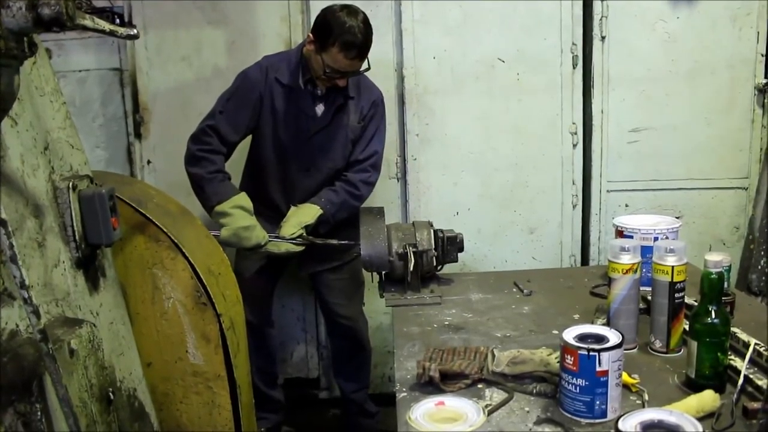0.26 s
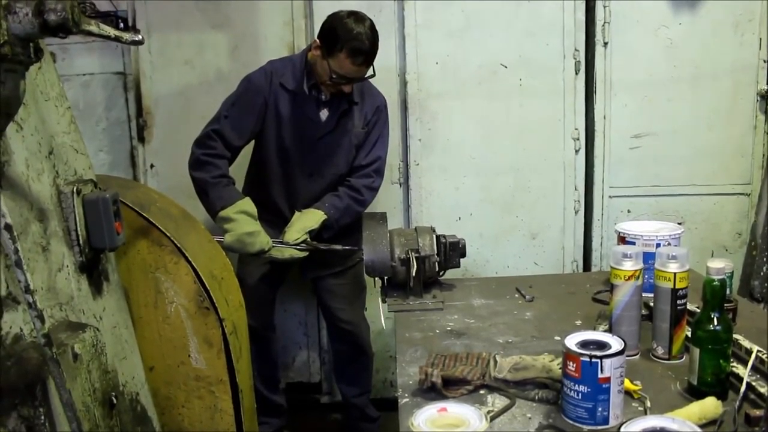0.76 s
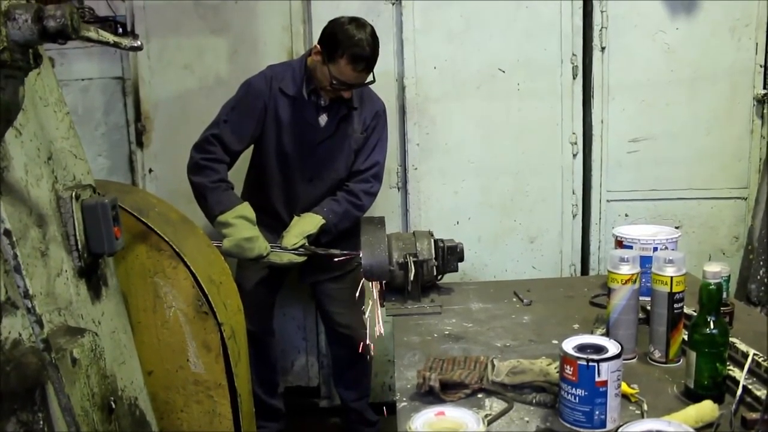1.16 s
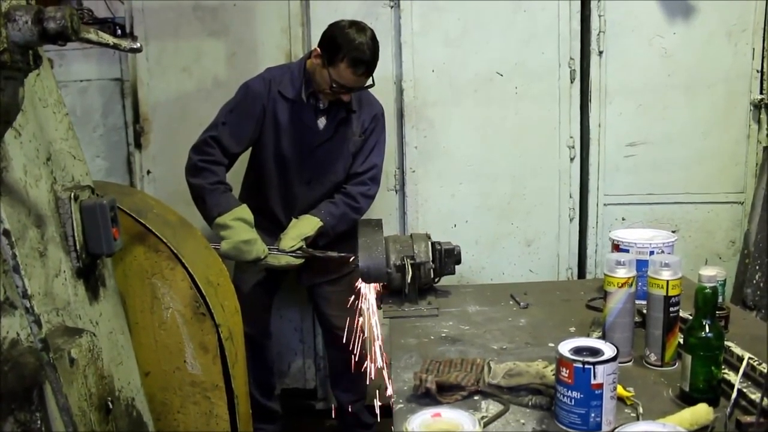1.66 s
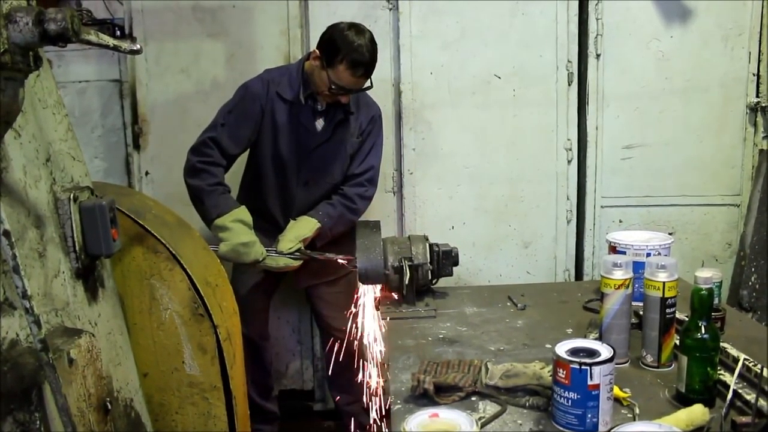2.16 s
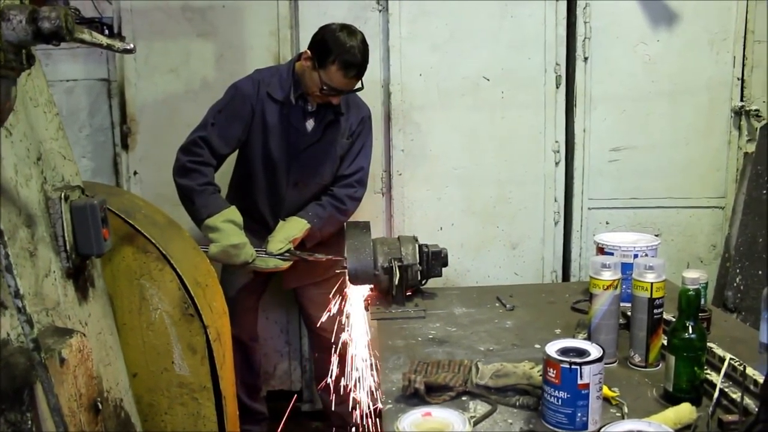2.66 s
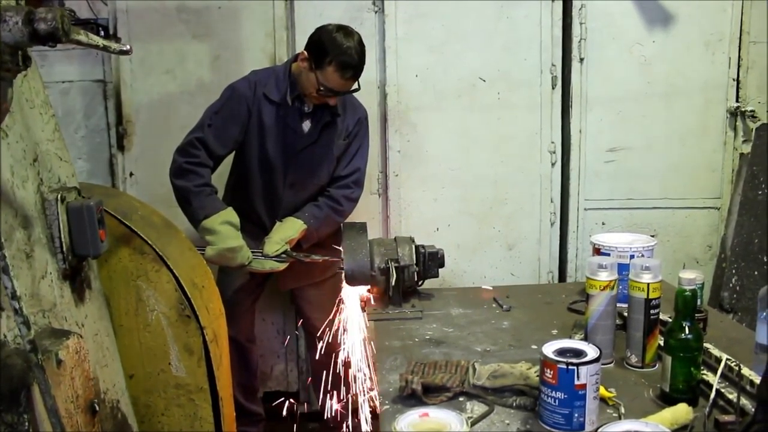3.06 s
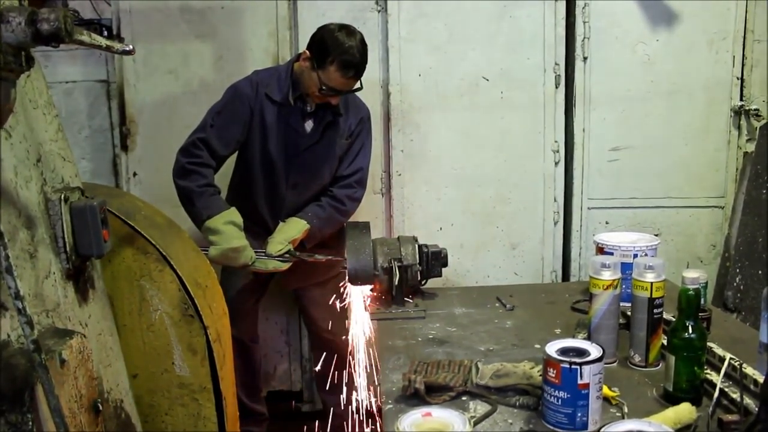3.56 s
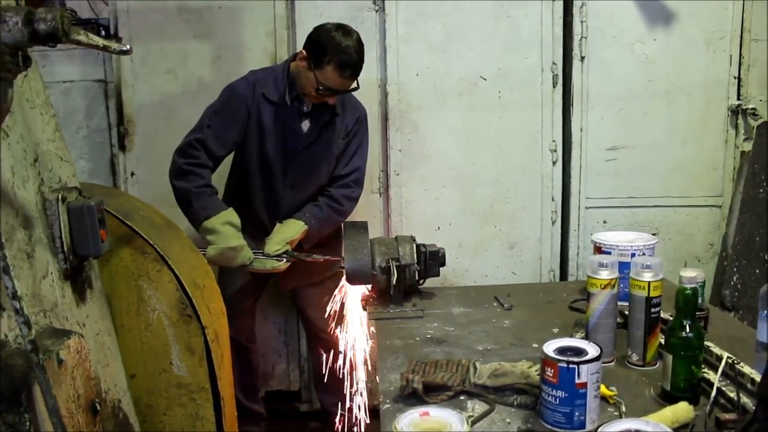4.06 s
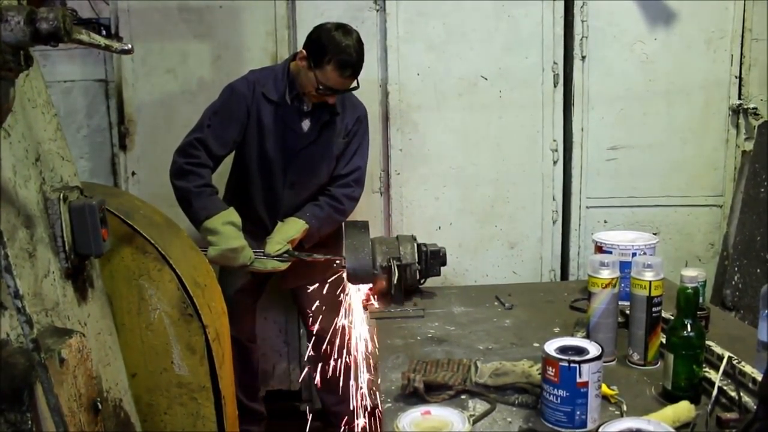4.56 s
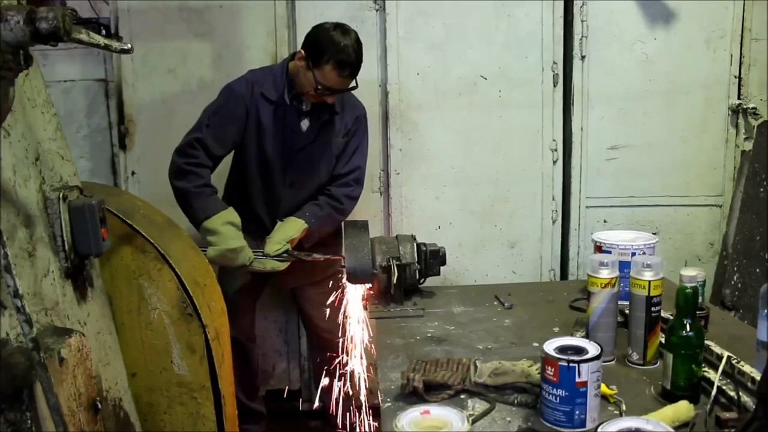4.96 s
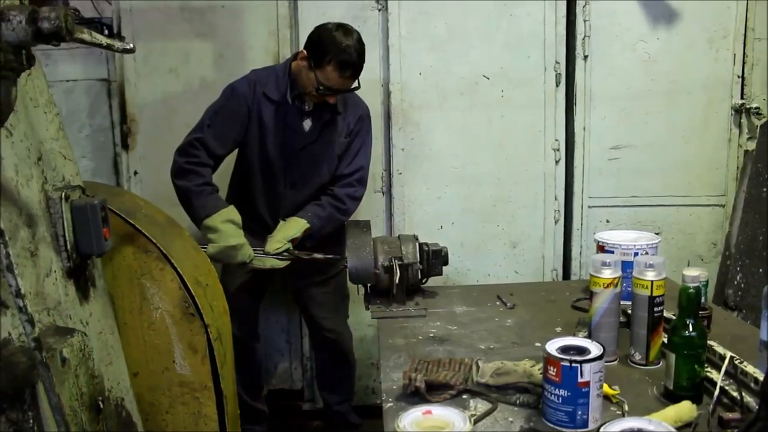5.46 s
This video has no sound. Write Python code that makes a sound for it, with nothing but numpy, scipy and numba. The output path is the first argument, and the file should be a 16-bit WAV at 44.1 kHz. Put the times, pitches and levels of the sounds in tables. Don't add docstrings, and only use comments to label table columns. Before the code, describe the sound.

A steel bar is ground on a spinning wheel in a hard-walled workshop. From 0 s a loud, gritty hiss and piercing metallic ring flutter roughly 25 times a second, with stronger knocking from 0.65 s. At about 1.4 s the contact lightens, then from 2.0 s the bar sweeps across with a smoother, less regular rasp, ringing as it lifts near 2.65 s. In the pause, a short stick-slip scrape sounds around 2.9-3.05 s and small bright scratches at 3.2-3.45 s, while low motor hum, rumble and airy whirr swell. Grinding bites again at 3.8 s and eases near 4.4 s. A faint rough squeal climbs around 4.5 s amid two hard dabs, at about 4.55 and 4.8 s. After 5.03 s only the running motor remains, growing louder to the end. Close-set stereo microphones, short reverberation, slightly saturated peaks and automatic gain.

```python
import sys
import numpy as np
from scipy import signal
from scipy.fft import rfft, irfft, next_fast_len
from scipy.io import wavfile
from scipy.ndimage import uniform_filter1d
from numba import njit

SR = 44100
rng = np.random.default_rng(int(sys.argv[2]) if len(sys.argv) > 2 else 0)


def bounce(signal):
    frames = np.transpose(np.atleast_2d(signal))
    limited = np.clip(frames, -1, 1)
    pcm = np.round(limited * 32767).astype(np.int16)
    wavfile.write(sys.argv[1], SR, pcm)


def volts(x):
    e = np.asarray(x, float) / 20
    return 10 ** e


N = 252252
SIZE = next_fast_len(N + SR)
HZ = np.arange(SIZE // 2 + 1) * SR / SIZE + 1e-3
T = np.arange(N) / SR


def unit(x):
    return x / np.sqrt(np.mean(abs(x) ** 2))


def columns(table):
    s, *values = np.transpose(table)
    return [np.interp(T, s, v) for v in values]


def stepped(table, slew_s):
    s, *values = np.transpose(table)
    row = np.maximum(np.searchsorted(s, T, side="right") - 1, 0)
    return [uniform_filter1d(v[row], int(slew_s * SR), mode="nearest") for v in values]


def colour(points):
    hz, db = np.transpose(points)
    return volts(np.interp(np.log(HZ), np.log(hz), db))


def ringing(modes):
    response = 0
    for k, (hz, width, db) in enumerate(modes):
        response = response + (-1) ** k * volts(db) / (1 + 2j * (HZ - hz) / width)
    return response


def through(x, response):
    return irfft(rfft(x, SIZE) * response, SIZE)[..., :N]


def walk(rate):
    k = int(SR / rate)
    held = np.repeat(rng.standard_normal(N // k + 1), k)
    return unit(uniform_filter1d(uniform_filter1d(held, k), k)[:N])


# (time [s], share of the rim's roughness returning next turn [0-1], knock [0-1])
HOLDS = [
    (0, .88, .25),
    (.65, .88, 1),
    (1.4, .8, .3),
    (2.02, .22, 0),
    (3.2, .35, 0),
    (3.87, .72, .2),
    (4.38, .3, 0),
]


def wheel():
    share, knock = stepped(HOLDS, slew_s=0.2)
    turns_hz = 24.85 - 0.23 * knock
    return turns_hz, share, knock


@njit
def turn_again(fresh, lag, share):
    y = fresh.copy()
    for i in range(2000, len(y)):
        back = i - lag[i]
        k = int(back)
        last = y[k] + (back - k) * (y[k + 1] - y[k])
        y[i] = share[i] * last + np.sqrt(1 - share[i] ** 2) * fresh[i]
    return y


def rim(fresh, keep=1.0):
    turns_hz, share, _ = wheel()
    return turn_again(fresh, SR / turns_hz, np.clip(keep * share, 0, 0.97))


def knocks():
    turns_hz, _, strength = wheel()
    turn = np.floor(np.cumsum(turns_hz) / SR + 0.88)
    return strength * np.diff(turn, prepend=0) * np.sqrt(SR / turns_hz)


def touching():
    first = T < SWEEP[-1][0]
    second = (T > RETURN[0][0]) & (T < DABS[-1][0])
    return 1.0 * (first | second)


# (frequency [Hz], width [Hz], level [dB])
BAR = [(916, 125, -6.5), (1062, 37, -12), (1089, 18, -4.5), (1190.4, 16.6, 7), (1263, 24.5, 2),
       (1312, 31, 1.5), (1420, 54, -2.5), (1802, 17, -14), (2176, 31, -11), (2926, 44, 4.5), (3713, 21, 3),
       (4074, 44, 4.5), (4173, 58, 1.5), (4370, 49, -3), (4600, 30, -7), (5000, 30, -23), (5660, 20, 3),
       (6500, 58, -27), (7060, 41, -27), (7430, 61, 7.5), (8400, 160, -4.5), (9260, 170, 6.5),
       (9450, 38, -22), (11300, 110, -10)]
# (frequency [Hz], density [dB per Hz])
GRIT = [(290, -100), (500, -9), (805, -30), (1220, -35), (1610, -7), (1880, -5), (2620, -8), (2860, 4.5),
        (3310, 0.5), (4100, 10.5), (6800, 1), (10600, 2.5), (15700, -12)]
# (time [s], pressure as heard [dB], how freely the bar rings [dB])
LONG_CUT = [
    (0.0, -22, -2),
    (0.022, -23, -6.5),
    (0.118, -23.5, -1.5),
    (0.95, -23, -10),
    (1.224, -23, -6.5),
    (1.246, -21.5, -9),
    (1.37, -26, -2.5),
]
LIGHT_CUT = [
    (1.39, -29.5, -7),
    (1.52, -27.5, -8),
    (1.956, -25, -10),
    (1.96, -25, -14),
]
SWEEP = [
    (1.99, -24.5, -4),
    (2.04, -24, -0.5),
    (2.27, -22.5, -2),
    (2.426, -27.5, 2.5),
    (2.54, -22, -4.5),
    (2.616, -29, 3),
    (2.63, -39, 6),
    (2.66, -33, 12),
]
RETURN = [
    (3.81, -33, -4),
    (3.816, -25, -4.5),
    (3.92, -23, -1),
    (4.266, -23, -6.5),
    (4.312, -24, -11),
    (4.38, -28.5, -7),
]
DABS = [
    (4.41, -26.5, -4),
    (4.436, -27, -2),
    (4.506, -29, -8),
    (4.548, -20.5, -10.5),
    (4.75, -28.5, -4.5),
    (4.796, -20.5, -9.5),
    (4.972, -30.5, -0.5),
    (5.028, -46, -6),
    (5.04, -49, -2),
]
# (time [s], low body of the bar [dB], its overtone [dB], bite of the grit [dB])
GRIPS = [
    (0, -10, -16, -0.5),
    (.65, -10.5, -12, -1.5),
    (1.15, -7.5, -10.5, -2.5),
    (1.4, -6.5, -15, 0.5),
    (1.99, -5.5, -12.5, -3.5),
    (2.45, -5.5, -12, -5.5),
    (3.81, -8.5, -14, -3),
    (4.2, -7.5, -11, -2),
    (4.53, -9.5, -12, -3.5),
    (4.77, -7.5, -10, -4),
]


def grinding():
    throb = volts(1.33 * rim(walk(300)) + 0.33 * rim(walk(50)))
    grains = volts(3.0 * np.minimum(rng.exponential(size=N), 5))
    scrape = rim(unit(grains * rng.standard_normal(N)), keep=0.93) * unit(throb)
    thumped = scrape * (1 - 0.35 * wheel()[2]) + 1.35 * knocks()

    body = colour(GRIT) * volts(-4) + ringing(BAR)
    low = 1 / (1 + (HZ / 2500) ** 8)
    high = 1 / (1 + (6500 / HZ) ** 8)
    ring = 1 / (1 + ((HZ - 1130) / 300) ** 4)
    overtone = 1 / (1 + ((HZ - 2930) / 170) ** 4)

    pressure_db, ring_db = columns(np.vstack([LONG_CUT, LIGHT_CUT, SWEEP, RETURN, DABS]))
    body_db, overtone_db, bite_db = stepped(GRIPS, slew_s=0.11)
    on_rim = touching() * volts(pressure_db + 0.55)
    parts = [(scrape, 1 - low - high - overtone, 0),
             (scrape, overtone, overtone_db),
             (scrape, low - ring, body_db + 1.5),
             (thumped, ring, ring_db + 0.18),
             (scrape, high, bite_db + 0.9)]
    out = 0
    for push, band, db in parts:
        out = out + rfft(push * on_rim * volts(db), SIZE) * unit(body * band)
    return irfft(out, SIZE)[:N]


# (frequency [Hz], level [dB rms])
HUM = [(50, -49), (75, -53), (99.8, -39.5), (125, -56), (150, -56), (175, -60), (199.8, -31.5),
       (224.6, -36.5), (249.8, -37.5), (300, -41.5), (500, -40.5), (525, -48)]
# (frequency [Hz], density [dB per Hz])
RUMBLE = [(15, -62), (25, -75), (69, -12), (91, -9.5), (167, -3), (201, -4.5), (324, -5), (507, -7),
          (734, -5), (1000, -10.5), (1300, -55), (2200, -120)]
# (frequency [Hz], density [dB per Hz])
WHIRR = [(410, -14), (700, -16.5), (1360, 3), (1470, -5), (1790, -27), (2090, -7.5), (2380, -5),
         (4330, -5.5), (5690, -10.5), (10900, -21), (15700, -32)]
# (frequency [Hz], width [Hz], level [dB])
CASING = [(1065, 83, -12.5), (1458, 75, 1), (1796, 100, 0.5), (2500, 21, -22), (2550, 260, -20.5),
          (3110, 41, -34), (3980, 35, -37), (4300, 44, -32)]
# (time [s], motor level [dB])
GAIN = [(0, -36), (.9, -40.5), (1.2, -36.5), (1.5, -37.5), (2.0, -32.5), (2.2, -37), (2.75, -37.5),
        (2.9, -37), (3.15, -34.5), (3.4, -30.5), (3.77, -26), (3.9, -34), (4.05, -39), (4.5, -35),
        (5.03, -37), (5.3, -32.5), (5.72, -28)]


def motor():
    gain_db = columns(GAIN)[0]
    load = uniform_filter1d(touching(), int(0.2 * SR), mode="nearest")
    idle_hum_db, loaded_hum_db = -0.6, -7
    hum_db = idle_hum_db + (loaded_hum_db - idle_hum_db) * load
    rumble_db = 0.13 + 1.5 * load * (1 - wheel()[1])

    lines = 0
    for hz, db in HUM:
        lines = lines + volts(db + 0.39 * walk(6.17)) * np.sin(2 * np.pi * (hz * T + rng.random()))
    rumble = through(rim(rng.standard_normal(N), keep=0.28), colour(RUMBLE))
    rattle = rng.standard_normal(N) * volts(1.0 * walk(200) + 0.78 * walk(6.7))
    whirr = through(rattle, colour(WHIRR) + volts(6.5) * ringing(CASING))
    mix = volts(hum_db) * unit(lines) + volts(rumble_db) * unit(rumble) + volts(4.5) * unit(whirr)
    return volts(gain_db) * mix


def drag_db():
    attack_s, hold_s, fade_db_s = 0.015, 0.083, 159
    age = T - 2.922
    rise = -22 * np.clip(1 - age / attack_s, 0, 1)
    fade = -fade_db_s * np.clip(age - attack_s - hold_s, 0, 0.08)
    return np.where((age > 0) & (T < 3.2), -24 + rise + fade, -120)


# (frequency [Hz], width [Hz], level [dB])
REST = [(1490, 26, 3), (1830, 74, -1.5), (2120, 64, -6), (2710, 100, -2.5), (3320, 21, -3), (3370, 55, -13),
        (3740, 26, -9), (4500, 73, -4), (5100, 44, -13), (6470, 27, -22), (6340, 33, -18),
        (8750, 43, -32.5), (9400, 49, -18), (10600, 140, -31)]


def drag():
    clicks = volts(2.5 * np.minimum(rng.exponential(size=N), 5)) * rng.standard_normal(N)
    slips = clicks * volts(2 * walk(80))
    scuff = volts(-14.0) / (1 + (HZ / 6000) ** 4) / (1 + (900 / HZ) ** 4)
    return through(unit(slips) * volts(drag_db()), unit(ringing(REST) + scuff))


# (time [s], peak level [dB])
TOUCHES = [(3.201, -34), (3.2754, -10), (3.2894, -16), (3.322, -12), (3.3944, -16), (3.404, -13),
           (3.4355, -15), (3.7558, -13.5), (3.8114, -7), (3.8168, -5.5), (3.8514, -4), (3.8894, -4),
           (4.438, -8.5), (4.4756, -10), (4.5295, -7), (4.544, -4), (4.5894, -8), (4.7705, -11),
           (4.7873, -4.5), (4.8298, -17), (4.9444, -15)]
# (frequency [Hz], density [dB per Hz])
TOUCH = [(1180, -42), (2000, -20), (2260, -27), (3880, 6), (5580, -1.5), (10300, 6.5), (13800, -4),
         (15700, -10)]


def touches():
    t60_s = 0.021
    push = np.zeros(N)
    for s, db in TOUCHES:
        near = slice(int(s * SR), int(s * SR) + SR // 10)
        age = np.maximum(T[near] - s, 0) * np.log(1000) / t60_s
        push[near] += volts(db - 10.5) * age * np.exp(1 - age)
    scratch = through(rng.standard_normal(N), colour(TOUCH) + volts(4) * ringing(BAR))
    return push * unit(scratch)


def slide():
    from_hz, to_hz = 1200, 2000
    gone = np.clip((T - 4.455) / 0.12, 0, 1)
    hz = from_hz * (to_hz / from_hz) ** gone
    squeal = np.sin(2 * np.pi * np.cumsum(hz) / SR)
    return volts(-29) * np.sin(np.pi * gone) * walk(250) * squeal


# (frequency [Hz], side minus mid [dB])
PORT_SIDE = [(60, -8), (110, -14), (200, -20), (380, -18), (700, -14), (1290, -10), (2380, -7),
             (4400, -6.5), (8120, -2), (15000, 1.5)]
# (frequency [Hz], left minus right [dB])
PORT_BALANCE = [(60, -4), (110, 2), (200, 1), (380, 0.0), (700, -0.5), (1290, -2.5), (2380, -0.5),
                (4400, 0), (8120, 5), (15000, 0)]


def workshop(x):
    t60_s, bright_t60_s, lag_s = 0.59, 0.37, 0.8e-5
    wet = volts(-6) / (1 + (350 / HZ) ** 2)
    t = np.arange(SR) / SR
    dull = 1 / (1 + (HZ / 4000) ** 2)
    tails = []
    for noise in rng.standard_normal((2, SR)):
        slow = rfft(noise * volts(-60 * t / t60_s), SIZE)
        fast = rfft(noise * volts(-60 * t / bright_t60_s), SIZE)
        tail = slow * dull + fast * (1 - dull)
        tails.append(tail / np.sqrt(uniform_filter1d(abs(tail) ** 2, size=400)))
    mid, side = tails
    side = colour(PORT_SIDE) * side
    tilt = np.sqrt(colour(PORT_BALANCE)) * np.exp(1j * np.pi * HZ * lag_s)
    both = np.array([tilt + wet * mid + side, 1 / tilt + wet * mid - side])
    return through(x, both / np.sqrt(1 + wet ** 2 + colour(PORT_SIDE) ** 2))


def scene():
    return workshop(grinding() + motor() + drag() + touches() + slide())


def roll_off(x):
    return signal.sosfilt(signal.butter(12, 15840, fs=SR, output="sos"), x)


def record(dry):
    high_pass = signal.butter(2, 45, "high", fs=SR, output="sos")
    mix = np.tanh(0.82 * signal.sosfilt(high_pass, dry)) / 0.8
    return roll_off(mix)


dry = scene()
out = record(dry)
bounce(out)
```